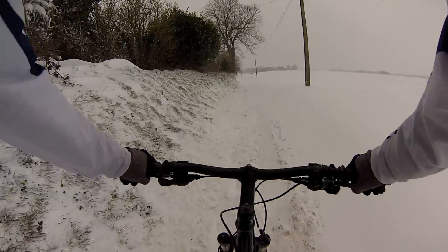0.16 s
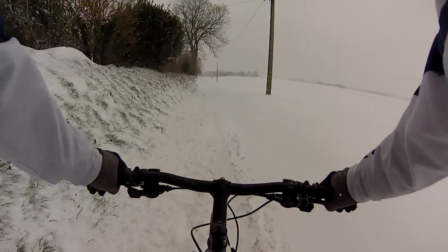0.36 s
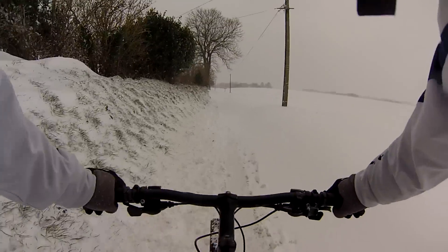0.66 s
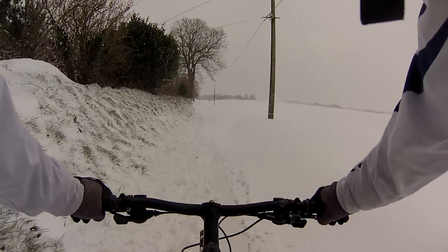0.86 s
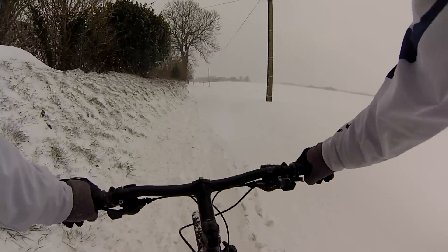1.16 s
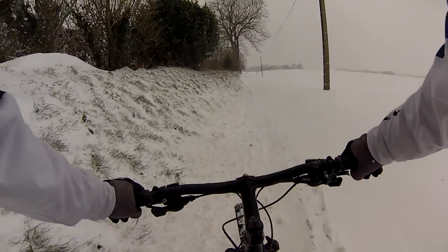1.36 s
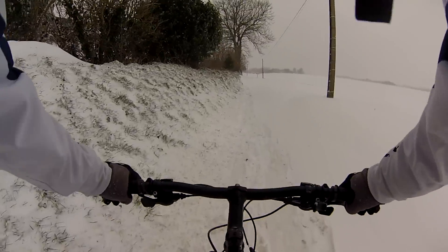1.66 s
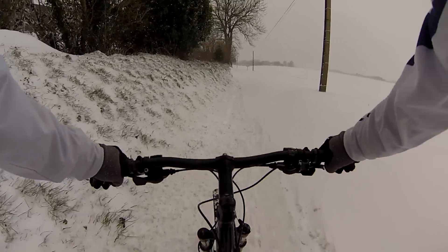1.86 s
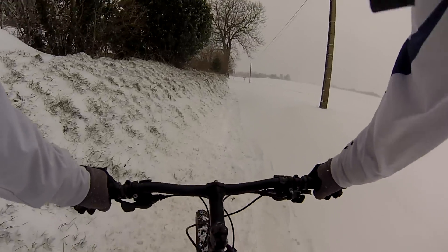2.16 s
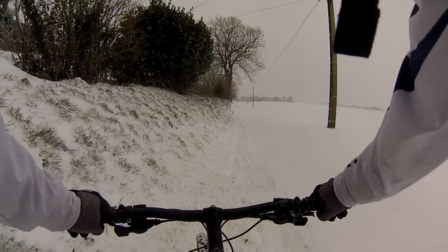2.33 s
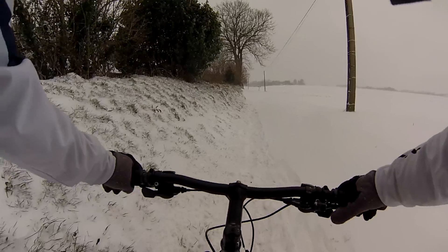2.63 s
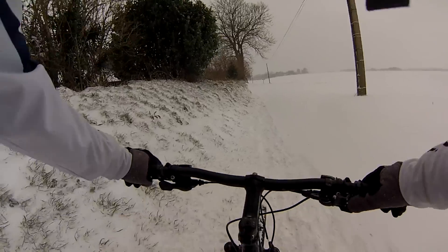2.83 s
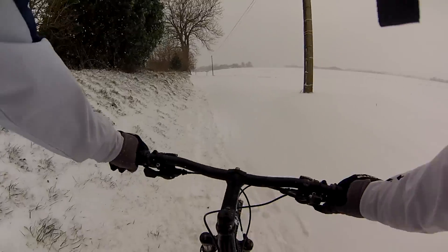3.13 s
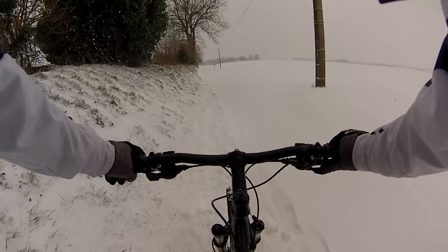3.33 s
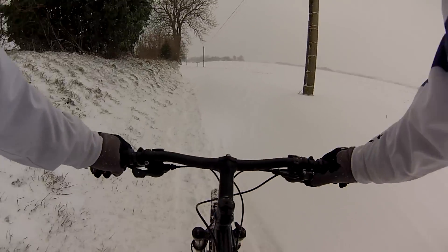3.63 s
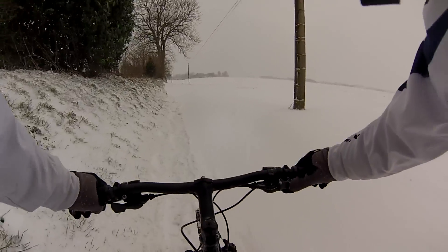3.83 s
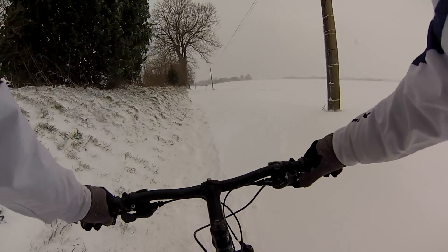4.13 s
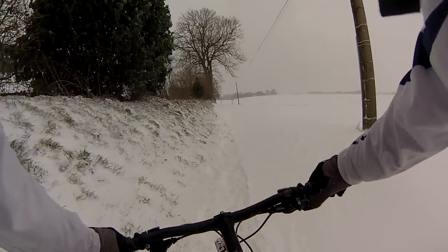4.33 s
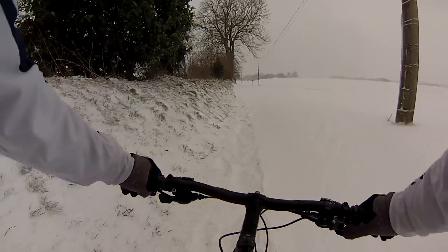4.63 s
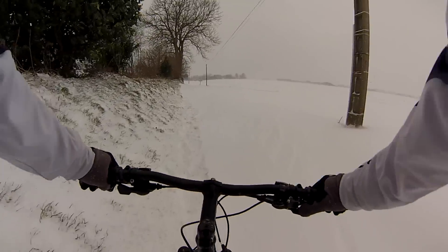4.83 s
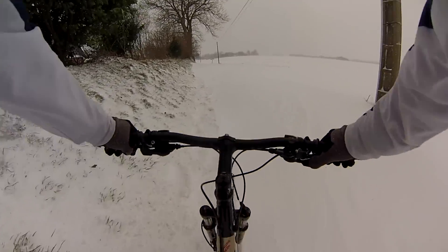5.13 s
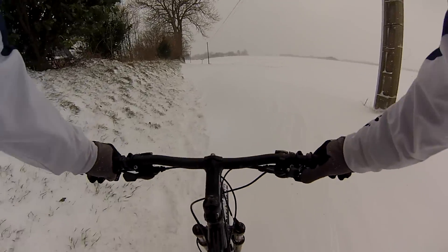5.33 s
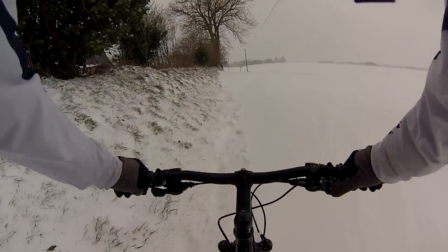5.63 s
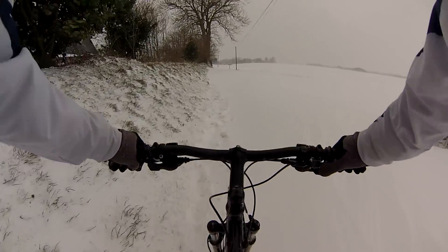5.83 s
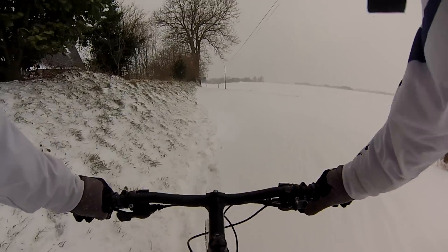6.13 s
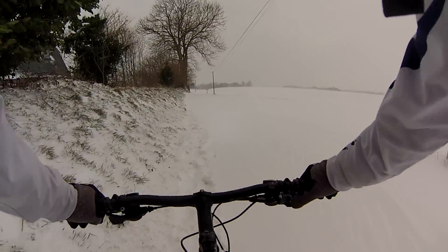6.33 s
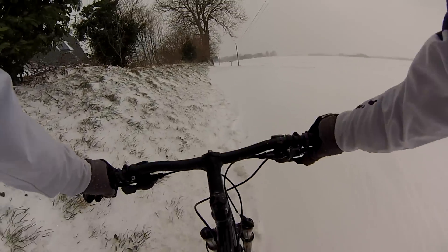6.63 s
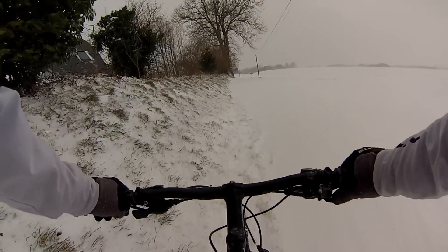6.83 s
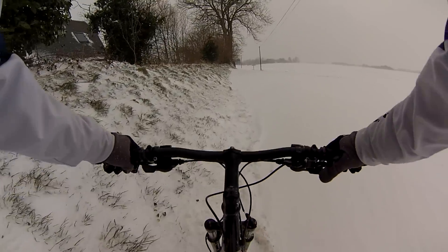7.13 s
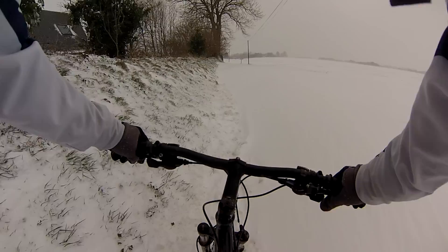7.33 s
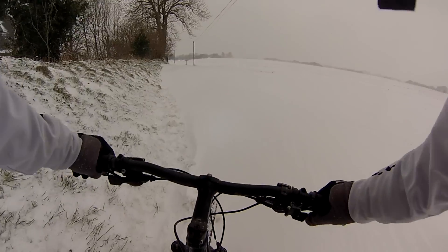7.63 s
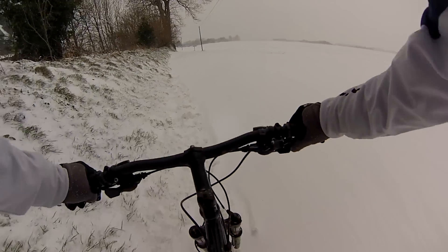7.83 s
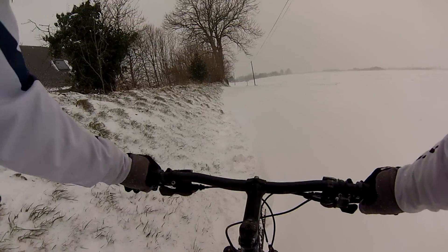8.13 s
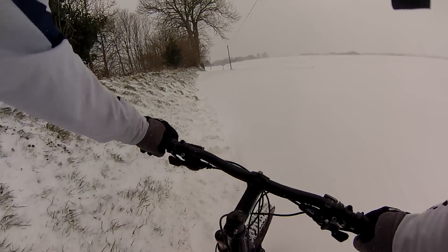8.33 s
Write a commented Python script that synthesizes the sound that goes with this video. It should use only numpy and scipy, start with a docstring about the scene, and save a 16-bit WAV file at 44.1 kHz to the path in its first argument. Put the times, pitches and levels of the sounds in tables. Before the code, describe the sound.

Gusty low wind buffets a cased microphone while bike tyres crunch through snow and the ride jolts, clicks and rattles.

```python
"""A snowy trail, from a mountain bike on the move; the microphone is sealed in a camera case on the
rider's chest. Closest is a deep uneven rumble as wind and jolts pump the case. From the tyres below,
snow crunches and rasps through the ringing plastic, among ticks, dull knocks and one clank of loose
metal. The harness rustles against the case, over a faint microphone hiss."""
import sys
import numpy as np
from scipy import signal
from scipy.fft import rfft, irfft, next_fast_len
from scipy.io import wavfile
from scipy.ndimage import uniform_filter1d

SR = 44100
rng = np.random.default_rng(int(sys.argv[2]) if len(sys.argv) > 2 else 0)


def to_wav(s):
    """Save 16-bit WAV."""
    ch = np.atleast_2d(s).T  # columns
    pcm = np.round(np.clip(ch, -1, 1) * 32767)  # PCM
    wavfile.write(sys.argv[1], SR, pcm.astype(np.int16))


N = 373527

# Modes of the plastic case around the microphone. Each row: pitch in Hz, width in Hz, level in dB.
CASE_MODES = [(1350, 195, -4.5), (1484, 270, -4), (2046, 770, -4), (1970, 400, -0.5), (2496, 545, -2),
              (3054, 257, -0.5), (3390, 85, -5), (3772, 300, -7), (4110, 1000, -12.5), (4876, 910, -13),
              (6660, 1500, -22.5), (8100, 750, -27.5)]
LOW_HZ, MIDDLE_HZ, TOP_HZ = (0, 1750), (1750, 2800), (2800, 9000)  # bands that group the modes
# What the chest straps pass on. Each row: frequency in Hz, spectrum level in dB.
HARNESS_SPECTRUM = [(110, -6.5), (190, -6), (346, -5), (1050, -17.5), (1360, -17), (2310, -120)]


def wind():
    """Wind right on the case: slow pressure buffeting with a lumpy flutter riding on it."""
    # The gusts. Each row: time in seconds, buffeting in dB, flutter in dB.
    gusts = [(0.03, -16.5, -47), (0.13, -26, -49), (0.25, -25, -42.5), (0.45, -22.5, -46.5),
             (0.68, -30, -57), (1.01, -24, -52), (1.35, -31.5, -50.5), (1.66, -36.5, -48), (1.8, -29, -55),
             (2.0, -30, -47.5), (2.28, -36, -46.5), (2.45, -26.5, -58), (2.6, -33.5, -51), (2.95, -26, -43),
             (3.25, -36, -43), (3.45, -32, -58), (3.68, -31.5, -47), (4.4, -34, -53.5), (4.63, -24.5, -47),
             (4.78, -32.5, -55), (4.93, -30.5, -42.5), (5.12, -31.5, -46), (5.24, -20, -42),
             (5.4, -38.5, -49.5), (5.6, -30.5, -44.5), (5.8, -39.5, -49.5), (5.95, -24, -46),
             (6.2, -31.5, -44.5), (6.38, -23.5, -48), (6.54, -33, -47), (6.7, -25, -45.5),
             (6.85, -37.5, -48), (7.1, -29, -49.5), (7.5, -36.5, -50), (7.92, -21, -43.5),
             (8.2, -32.5, -45), (8.45, -23.5, -41)]
    # The colour of each layer. Each row: frequency in Hz, spectrum level in dB.
    buffet_spectrum = [(2.5, -56), (8, 5.5), (22, 3), (31, -2.5), (45, -13.5), (58, -39), (99, -120)]
    flutter_spectrum = [(24, -64), (40, -4), (59, -0.5), (122, -8.5), (200, -27.5), (260, -21), (440, -120)]
    buffet_db, flutter_db = curves(gusts)
    buffet = steadied(coloured(rng.standard_normal(N), buffet_spectrum))
    lumpy_air = rng.standard_normal(N) * gain_of(4.7 * drift(0.029))
    flutter = steadied(coloured(lumpy_air, flutter_spectrum))
    fade_in = np.minimum(np.arange(N) / SR / 0.015, 1)
    return fade_in * (gain_of(buffet_db) * buffet + gain_of(flutter_db) * flutter)


def jolts():
    """Heavy jolts pump the case: a pressure crest between a quick dip and a slow one."""
    # Each row: crest time in seconds, peak in dB, nominal pitch in Hz.
    crests = [(0.381, -12, 84.4), (1.486, -27.5, 99), (2.195, -29.5, 80), (4.635, -28.5, 81),
              (5.198, -26.5, 83.6), (5.2202, -29.5, 99)]
    out, t = np.zeros(N), np.arange(-1500, 1500) / SR
    for s, db, hz in crests:
        turns = hz * t * np.where(t < 0, 1.255, 0.69)  # faster before the crest than after
        envelope = np.exp(-(turns / 0.39) ** 2 / 2)
        add(out, s + t[0], gain_of(db) * envelope * np.cos(2 * np.pi * turns))
    return out


def crunch():
    """Snow crystals break in clumps under the tyres; each case mode gets its own and shared snaps."""
    # Steady rolling in the snow. Each row: time in seconds, level in dB.
    rolling_levels = [(0.0, -55.5), (0.75, -58), (1.5, -57.5), (2.15, -57), (3.1, -55.5), (3.9, -61),
                      (5.4, -57), (6.3, -64), (7.3, -62.5), (8.47, -55.5)]
    rolling = gain_of(curves(rolling_levels)[0])
    clumps = gain_of(0.65 * drift(0.0065) + 0.92 * drift(0.021))
    shared_snaps = grains(per_s=400, spread_db=2.84)
    drives = []
    for _ in CASE_MODES:
        flicker = gain_of(1.5 * drift(0.018))
        own_snaps = 0.84 * rng.standard_normal(N) + 0.68 * grains(per_s=250, spread_db=3.06)
        drives.append(clumps * flicker * (own_snaps + 0.58 * shared_snaps))
    strap_thumps = gain_of(-13) * coloured(clumps * shared_snaps, HARNESS_SPECTRUM)
    dull = unit_rms(case_ring(drives, LOW_HZ)) + strap_thumps
    bright = unit_rms(case_ring(drives, MIDDLE_HZ) + case_ring(drives, TOP_HZ))
    dull_power, bright_power = scrunch_power()
    dull_level = np.sqrt(dull_power + rolling ** 2)
    bright_level = np.sqrt(bright_power + (rolling * gain_of(-2.5)) ** 2)
    return dull_level * dull + bright_level * bright


def scrunch_power():
    """A tyre breaks the crust: dull and bright power over time, in quick swells with slower fades."""
    # Each row: crest time in seconds, dull crunch in dB, bright scrape in dB relative to it,
    # seconds to fade by 13.5 dB.
    scrunches = [(-0.004, -47.5, -3.5, 0.2), (0.226, -45.5, 0.5, 0.043), (0.321, -46.5, -1.5, 0.097),
                 (0.503, -49.5, -2, 0.22), (0.649, -54.5, 0.5, 0.099), (0.882, -51, -1.5, 0.36),
                 (1.11, -52.5, 0.5, 0.08), (1.393, -54, 2, 0.43), (1.623, -50, -4.5, 0.29),
                 (1.84, -50.5, 2.5, 0.034), (1.933, -49.5, -3, 0.14), (2.037, -51, -2, 0.079),
                 (2.278, -52, -1, 0.11), (2.39, -52.5, -1, 0.17), (2.641, -54, 4, 0.12),
                 (2.765, -46, -5.5, 0.031), (2.953, -50.5, -0.5, 0.31), (3.04, -51, -5, 0.041),
                 (3.228, -51.5, 0.5, 0.16), (3.58, -55.5, -3.5, 0.79), (4.105, -55, -2, 0.33),
                 (4.223, -48, -4, 0.062), (4.512, -56, 2.5, 0.23), (4.87, -55.5, -1, 0.28),
                 (5.11, -59, 4.5, 0.04), (5.193, -47, -3.5, 0.074), (5.552, -49.5, -3.5, 0.057),
                 (5.916, -55, 0, 0.12), (6.237, -54.5, -4, 0.24), (6.56, -56.5, -2.5, 0.11),
                 (6.864, -53.5, -1.5, 0.3), (7.227, -58, -6, 0.095), (7.419, -46.5, -7, 0.028),
                 (7.614, -52, -3, 0.14), (7.755, -47, -4, 0.029), (7.913, -53, -2.5, 0.26),
                 (8.327, -62, 5, 0.033), (8.46, -50, 0.5, 0.19)]
    s, db, bright_db, fade_s = np.transpose(scrunches)[:, :, None]
    t = np.arange(0, N / SR, 1 / 1000)
    from_crest = np.where(t < s, 2 * (s - t), t - s) / fade_s  # swells twice as fast as it fades
    dull = gain_of(db - 13.5 * from_crest) ** 2
    bright = dull * gain_of(bright_db) ** 2
    return [np.interp(np.arange(N) / SR, t, power.sum(0)) for power in (dull, bright)]


def ticks():
    """Sharp ticks and rattles: a moment of scraping contact rings the case, with a bare bright snap."""
    # Each row: start in seconds, peak of the low modes in dB, then middle modes, top modes and snap
    # in dB relative to that, contact decay in milliseconds.
    contacts = [(0.0366, -30, -32, -28, -9, 1.2), (0.2119, -40.5, 9, -14, -33, 2.2),
                (0.2336, -51, 10, -2, -18, 1.7), (0.295, -40, -1, -9, -29, 2.3),
                (0.315, -32.5, -14, -16, -15, 2.9), (0.467, -40.5, -1, -15, -18, 2.3),
                (0.532, -42, 1, 2, -9, 2.2), (1.1346, -49.5, 15, 14, 16.5, 3),
                (1.332, -36, -6, -18, -22, 1.1), (2.165, -34.5, -22, -31, -34, 2.6),
                (2.279, -52, -13, 0, -14, 6.1), (2.399, -37.5, 2.5, -3.5, -21, 1.8),
                (2.4262, -42, 0, -19, -22, 1.4), (2.6176, -53, 11, 10, -15, 2.6),
                (2.649, -51.5, 6, 7.5, -25, 1.9), (2.779, -53, 7, -7, -18, 1.2),
                (2.974, -50, 6, 7, -10, 1.2), (3.7332, -40, -25, -20, -24, 2.7),
                (4.009, -41.5, -4, -10, -18, 2.8), (4.077, -43, 6, -20, -25, 1.6),
                (4.206, -42, -11, -18, -3, 1.3), (4.223, -49, 3, -10, 7, 2.9),
                (4.4864, -37, -35, -21, -15, 2.3), (4.9605, -39, -17, -27, -27, 3),
                (5.84, -44.5, -5, -7, -22, 2.3), (5.874, -42, -9, -14, -23, 2), (6.2, -48.5, -11, 1, 4, 2),
                (6.674, -54, 14, 0, 14.5, 2.7), (6.7441, -43.5, 0, -25, -24, 1.9),
                (7.1979, -38, -11, -16, -57, 2), (7.584, -46, -1, -3, -15, 1.6),
                (7.627, -37.5, -19, -25, -15, 2.4), (7.7274, -41, -6, 0.5, -9, 0.71),
                (7.759, -34, -13, -13, -32, 1.9), (7.8933, -31.5, 4, -28, -40, 0.94),
                (7.9553, -38, -11, -23, -21, 1.4), (8.045, -35.5, -15, -25, -5.5, 3.2),
                (8.408, -52, 15, 12.5, -22, 2.4), (8.434, -51.5, 19.5, 12, -10, 0.86)]
    snap_spectrum = [(2500, -3), (4200, 15), (9000, -2.5), (12000, -8), (15000, -26)]  # Hz, dB
    onset_ms, touch_damping = 0.65, 1.4  # a touch on the case widens its modes
    out, t = np.zeros(N), np.arange(-300, 1500) / SR
    t_ms = 1000 * np.maximum(t, 0)
    for s, db, middle_db, top_db, snap_db, decay_ms in contacts:
        envelope = np.exp(-t_ms / decay_ms) * (1 - np.exp(-t_ms / onset_ms))
        scrape = envelope * rng.standard_normal(len(t))
        drives = [scrape] * len(CASE_MODES)
        low, middle, top = (unit_peak(case_ring(drives, band, touch_damping))
                            for band in (LOW_HZ, MIDDLE_HZ, TOP_HZ))
        ring = low + gain_of(middle_db) * dulled(middle) + gain_of(top_db) * top
        snap = gain_of(snap_db) * unit_peak(coloured(scrape, snap_spectrum))
        add(out, s + t[0], gain_of(db) * (ring + snap))
    return out


def knocks():
    """Dull knocks on the case, each a short push on the air sealed in with the microphone."""
    # Each row: start in seconds, peak in dB, pitch in Hz.
    pushes = [(1.399, -35.5, 335), (1.6447, -33.5, 276), (2.166, -34.5, 252), (2.3893, -36.5, 272),
              (2.424, -36, 382), (2.743, -34.5, 402), (2.952, -37, 284), (3.4617, -38, 318),
              (3.5443, -35.5, 504), (3.608, -32.5, 294), (3.646, -44, 290), (3.7318, -34, 760),
              (4.962, -35, 320), (5.378, -40, 500), (5.839, -30.5, 340), (5.874, -28.5, 302),
              (6.368, -41.5, 500), (6.406, -40, 393), (6.569, -38.5, 250), (7.6267, -41, 326),
              (7.8588, -33, 360), (7.928, -31.5, 258), (8.301, -40.5, 316)]
    out = np.zeros(N)
    for s, db, hz in pushes:
        add(out, s, -gain_of(db) * thud(hz, decay_cycles=0.23))
    return out


def clank():
    """A loose metal part hits once: a push, then its modes swell and die away with a slight rattle."""
    # Each row: pitch in Hz, level in dB, seconds to fall by 60 dB.
    metal_modes = [(610, -8.5, 0.027), (747, -9, 0.04), (1350, -0.5, 0.05), (1540, -10, 0.027),
                   (2163, -7, 0.033), (3120, 2, 0.017), (3770, -6, 0.021), (4350, -14, 0.027),
                   (5020, -12, .03), (6800, -19.5, .02), (7900, -21, .02)]
    start_s, swell_ms = 7.4121, 0.84
    out, t = np.zeros(N), np.arange(3000) / SR
    wobble = unit_rms(uniform_filter1d(rng.standard_normal((len(metal_modes), len(t))), 60))
    ring = sum(gain_of(db + rattle_db - 60 * t / t60) * np.sin(2 * np.pi * hz * t)
               for (hz, db, t60), rattle_db in zip(metal_modes, 3.5 * wobble))
    swell = 1 - np.exp(-1000 * t / swell_ms)
    add(out, start_s, gain_of(-23.5) * unit_peak(ring * swell))
    add(out, start_s, gain_of(-23) * thud(570, decay_cycles=0.2))
    return out


def rasps():
    """A tyre slips on packed snow: crisp bursts of tiny slips ring the middle modes and one high mode."""
    # Each row: midpoint in seconds, level in dB, length in seconds.
    bursts = [(2.388, -50, 0.027), (4.115, -54, 0.07), (4.382, -55, 0.038), (4.53, -55.5, 0.14),
              (5.085, -56.5, .05), (5.191, -46, 0.051), (6.178, -51.5, 0.053), (6.559, -49, 0.073),
              (7.506, -60, 0.049)]
    t = np.arange(N) / SR
    level = sum(gain_of(db) * np.exp(-abs(2 * (t - s) / length) ** 2.2) for s, db, length in bursts)
    slips = grains(per_s=1500, spread_db=0.92) + 0.55 * rng.standard_normal(N)
    drives = [slips] * len(CASE_MODES)
    middle = dulled(case_ring(drives, MIDDLE_HZ))
    high = gain_of(-2.2) * case_ring(drives, band_hz=(4500, 5500))
    return level * unit_rms(middle + high)


def rustle():
    """The chest straps pass on dull rubbing and small bumps; each scrunch shakes out a little more."""
    # Each row: time in seconds, level in dB.
    rustle_levels = [(0.0, -55), (0.6, -62.5), (1.5, -55.5), (2.6, -59), (3.55, -58.5), (4.2, -60),
                     (4.8, -55), (7.15, -64.5), (7.8, -58), (8.47, -60)]
    flicker = gain_of(3.13 * drift(0.021))
    rubbing = 1.42 * rng.standard_normal(N) + 0.6 * grains(per_s=150, spread_db=2)
    shaken_power = gain_of(-3) ** 2 * scrunch_power()[0]
    level = np.sqrt(gain_of(curves(rustle_levels)[0]) ** 2 + shaken_power)
    return level * coloured(flicker * rubbing, HARNESS_SPECTRUM)


def microphone_hiss():
    """The microphone's own steady noise, far behind everything else."""
    # Each row: frequency in Hz, spectrum level in dB.
    hiss_spectrum = [(2500, -6), (5600, -4), (9000, -7), (12000, -7.5), (15200, -16)]
    return gain_of(-70.5) * coloured(rng.standard_normal(N), hiss_spectrum)


def case_ring(drives, band_hz, damping=1):
    """The plastic case rings in the modes within one band, each excited by its own drive."""
    t = np.arange(1024) / SR
    out = np.zeros(len(drives[0]))
    for drive, (hz, width, db) in zip(drives, CASE_MODES):
        if band_hz[0] < hz < band_hz[1]:
            age = np.pi * width * damping * t
            envelope = age * np.exp(-age)  # builds softly, so little leaks beside the mode
            ring = gain_of(db) * width * envelope * np.sin(2 * np.pi * hz * t)
            out += signal.oaconvolve(drive, ring)[:len(drive)]
    return out


def thud(hz, decay_cycles):
    """A damped push of about one swing."""
    turns = np.arange(int(4 * SR / hz)) * hz / SR
    return unit_peak(np.sin(2 * np.pi * turns) * turns * np.exp(-turns / decay_cycles))


def grains(per_s, spread_db):
    """Random clicks, most small, a few large, at rms 1."""
    fires = rng.random(N) < per_s / SR
    size_db = spread_db * np.minimum(rng.exponential(1, N), 5)
    return unit_rms(fires * gain_of(size_db) * rng.standard_normal(N))


def drift(seconds):
    """A smooth random curve of rms 1 that changes over about this time."""
    return unit_rms(smoothed(rng.standard_normal(N), seconds))


def steadied(x):
    """Evens out chance swells slower than about 0.22 s, so that the gust curve sets the level."""
    return x / np.sqrt(abs(smoothed(x ** 2, seconds=0.22)) + 1e-9)


def smoothed(x, seconds):
    """A moving average, applied twice."""
    size = int(seconds * SR)
    return uniform_filter1d(uniform_filter1d(x, size), size)


def coloured(x, spectrum):
    """Filters x by a curve of (Hz, dB) points and scales it to rms 1."""
    hz, db = np.transpose(spectrum)
    size = next_fast_len(len(x))
    bin_hz = np.fft.rfftfreq(size, 1 / SR)
    response = gain_of(np.interp(np.log(bin_hz + 0.1), np.log(hz), db))
    return unit_rms(irfft(rfft(x, size) * response, size)[:len(x)])


def dulled(x):
    """Takes off the treble above 2900 Hz, as a soft contact does."""
    return signal.sosfilt(signal.butter(6, 2900, fs=SR, output="sos"), x)


def curves(rows):
    """Turns rows that begin with a time in seconds into one full-length curve per further column."""
    s, *columns = np.transpose(rows)
    return [np.interp(np.arange(N) / SR, s, column) for column in columns]


def add(mix, s, sound):
    """Mixes a sound in at s seconds."""
    part = mix[round(s * SR):][:len(sound)]
    part += sound[:len(part)]


def gain_of(db):
    """Decibels to amplitude."""
    return 10 ** (np.asarray(db) / 20)


def unit_rms(x):
    """Scales to rms 1."""
    return x / np.sqrt(np.mean(x ** 2) + 1e-20)


def unit_peak(x):
    """Scales to peak 1."""
    return x / abs(x).max()


def scene():
    """Everything as it arrives inside the case, in mono."""
    mix = wind() + crunch() + rustle() + ticks() + knocks() + jolts()
    return (mix + microphone_hiss() + rasps() + clank())[None]


def record(dry):
    """The camera cuts off steeply at 15290 Hz."""
    lowpass = signal.firwin(511, 15290, window=("kaiser", 9), fs=SR)
    return signal.oaconvolve(dry, lowpass[None], "same")


dry = scene()
out = record(dry)
to_wav(out)
```